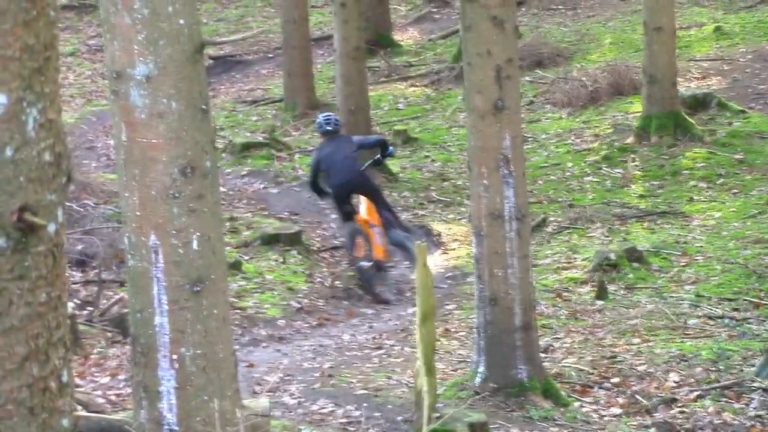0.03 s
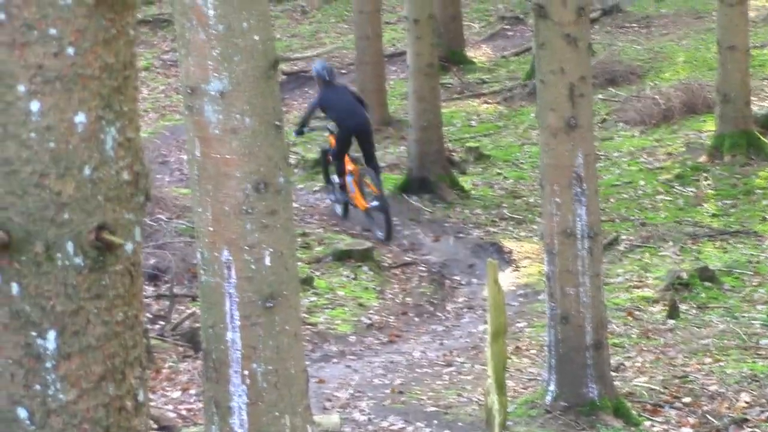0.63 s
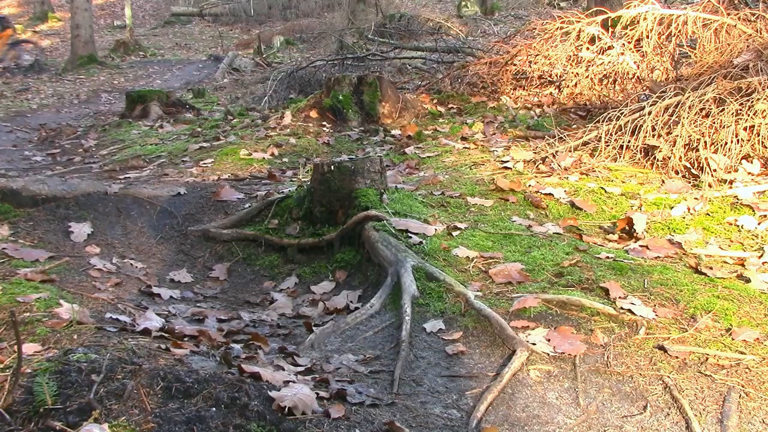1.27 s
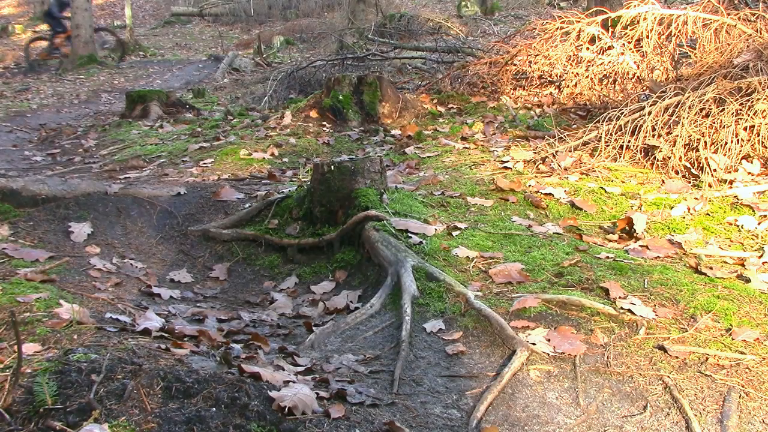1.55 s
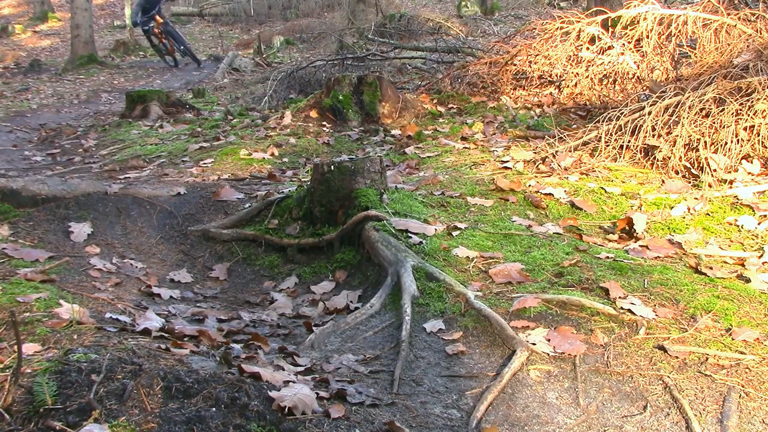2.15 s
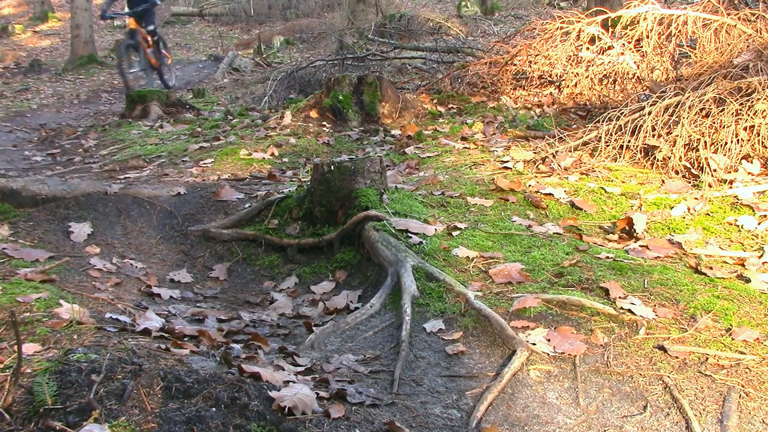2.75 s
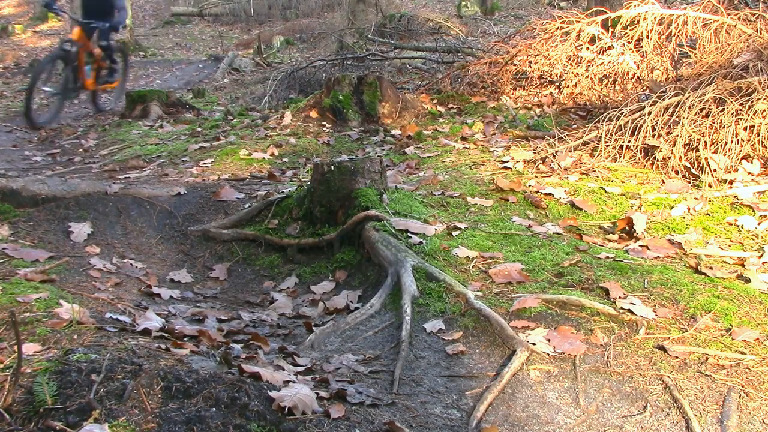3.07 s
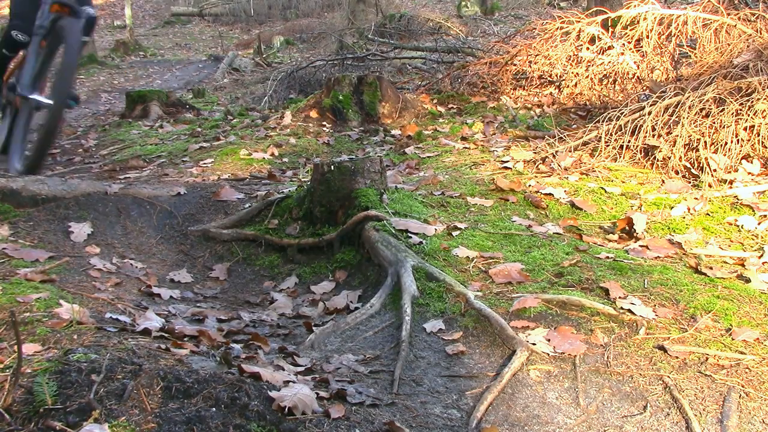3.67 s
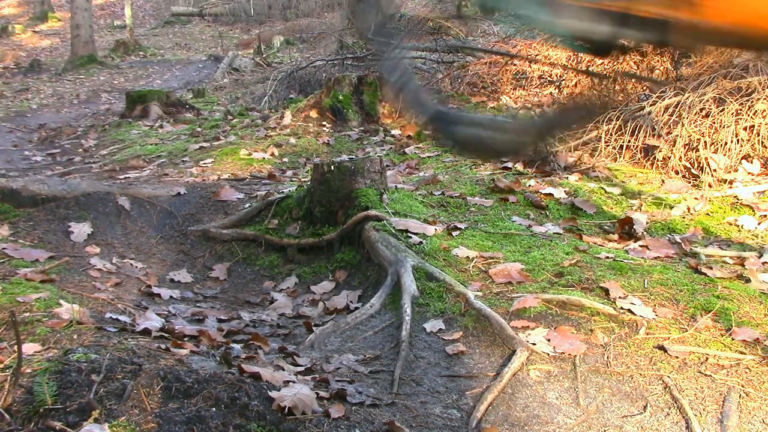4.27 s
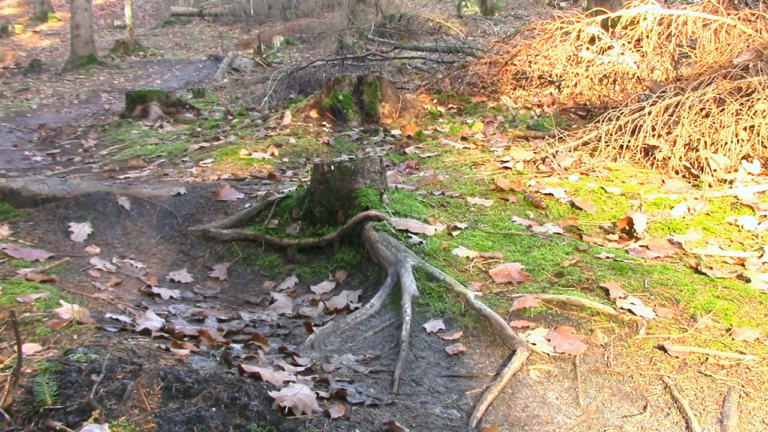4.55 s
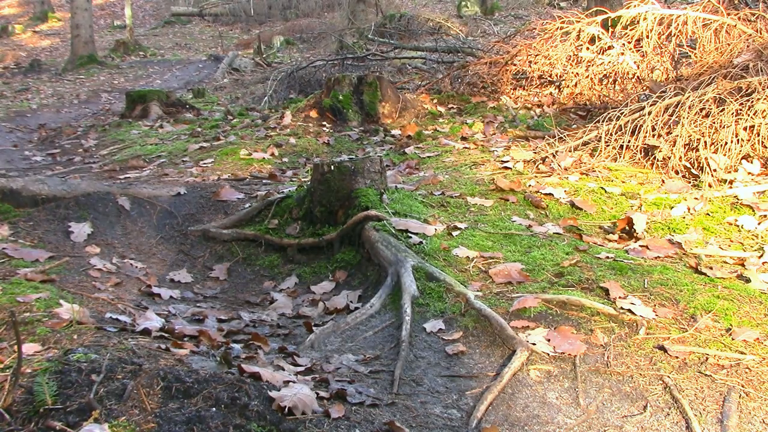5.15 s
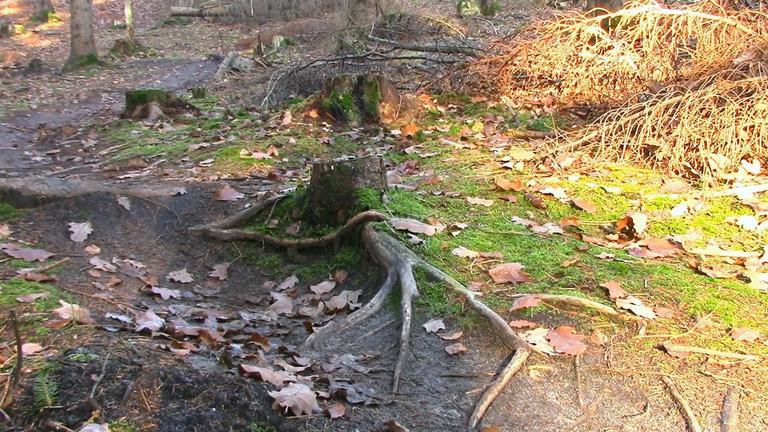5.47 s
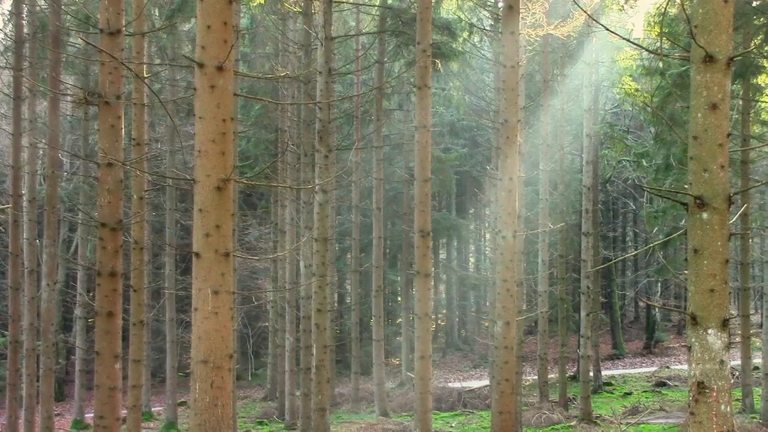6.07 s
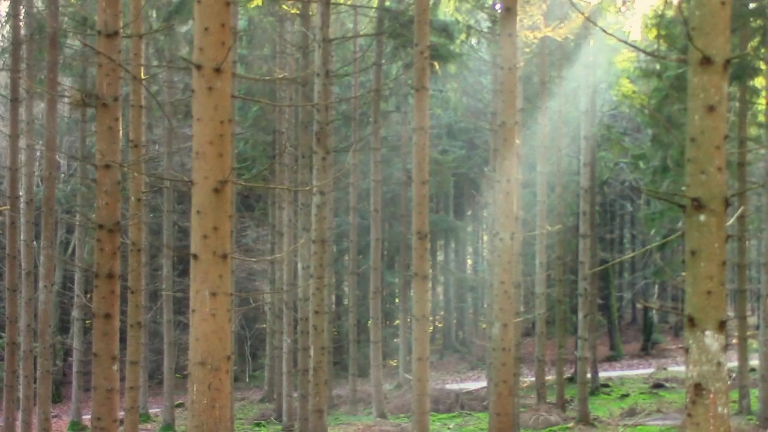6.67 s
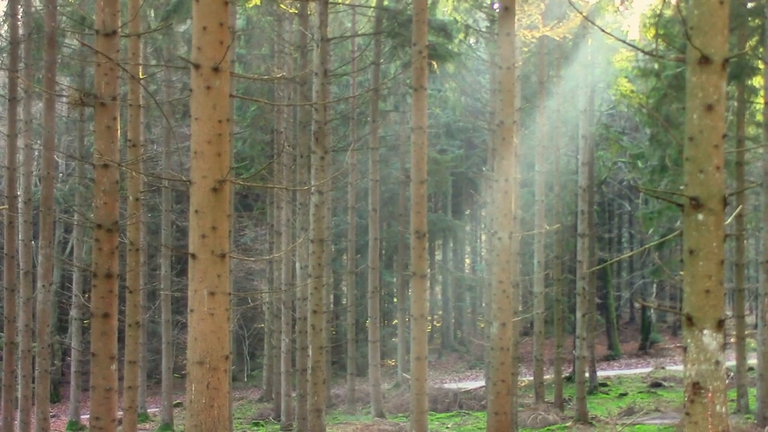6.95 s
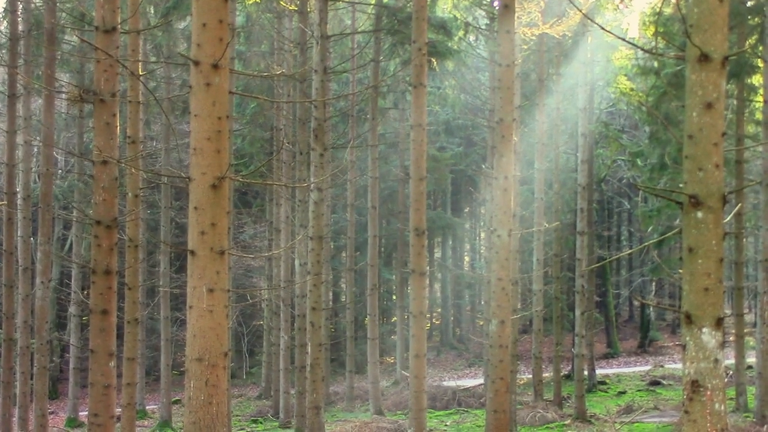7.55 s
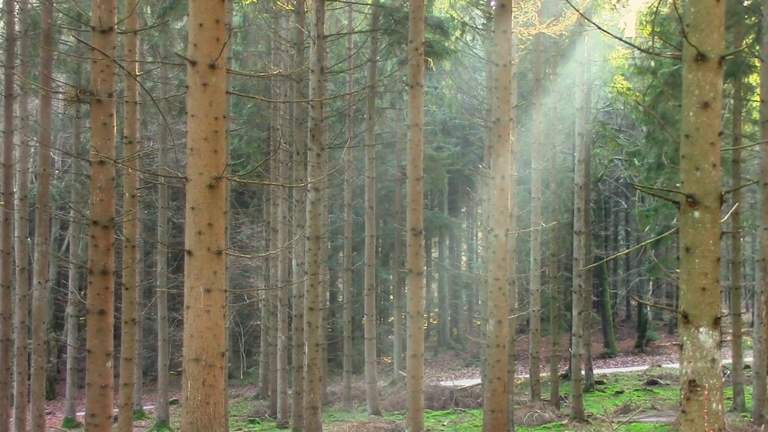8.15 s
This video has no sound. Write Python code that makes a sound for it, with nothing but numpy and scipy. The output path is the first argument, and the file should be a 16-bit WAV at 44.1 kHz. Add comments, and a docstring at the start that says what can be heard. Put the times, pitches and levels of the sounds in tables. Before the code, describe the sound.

A mountain bike rides a leafy forest trail, starting some way off with a tyre scuff, rumble and a few clacks, followed by faint freewheel ticking. A small bird gives two thin, high squeaks at about 1.7 seconds. The tyres rumble and crunch closer, and from 3.3 seconds sharp clacks and thumps over roots build up with rapid ticking. The bike takes off and passes right by the microphone at 4.3 seconds, then lands at about 4.5 with the loudest thump, a crack and sprays of grit. Weaker bounces follow as it rolls away, the knocks echoing lightly among the trees. At 5.8 seconds the background changes to a louder, steady forest hiss. The bike is now further off, with a burst of freewheel buzzing, a rattle at 6.5, a few clicks, then more ticking and a faint tyre hum around 8 seconds.

```python
"""A mountain bike coasts down a leafy forest trail, freehub pawls ticking: a corner and a jump far off,
then a close pass with take-off and hard landing. Tyres rumble, crush leaves and spray grit; roots
ring tyre and frame; chain, brake, stones and twigs clack. A small bird squeaks twice; trunks echo.
Then the scene changes to a hissier stretch of forest, where the bike rattles by further away."""
import sys
import numpy as np
from scipy import signal
from scipy.fft import rfft, irfft, next_fast_len
from scipy.io import wavfile

SR = 44100
rng = np.random.default_rng(int(sys.argv[2]) if len(sys.argv) > 2 else 0)


def to_wav(s):
    """Save 16-bit WAV."""
    ch = np.atleast_2d(s).T  # columns
    pcm = np.round(np.clip(ch, -1, 1) * 32767)  # PCM
    wavfile.write(sys.argv[1], SR, pcm.astype(np.int16))


N = 371322
T = np.arange(N) / SR
PASS_S, PASS_DISTANCE_M, SPEED_M_PER_S = 4.294, 1.31, 6.1
DISTANCE_M = np.hypot(PASS_DISTANCE_M, SPEED_M_PER_S * (T - PASS_S))
SCENE_CHANGE_S = 5.826
FAR = np.clip((T - SCENE_CHANGE_S) / 0.0019, 0, 1)  # 0 in the first scene, 1 in the second


def from_db(db):
    """Decibels to gain."""
    return 10 ** (np.asarray(db) / 20)


def rms_one(x):
    """Scale to rms 1."""
    return x / np.sqrt(np.mean(x ** 2) + 1e-20)


def cut(x, hz, kind="low", order=2):
    """Butterworth low- or high-pass."""
    return signal.sosfilt(signal.butter(order, hz, kind, fs=SR, output="sos"), x)


def drift(rate_hz):
    """Random curve through knots of spread 1."""
    knots = rng.standard_normal(4000)
    return np.interp(T * rate_hz, np.arange(len(knots)), knots)


def swell(at_s, half_s):
    """Bell curve of height 1."""
    return np.exp(-((T - at_s) / half_s) ** 2)


def ring(x, hz, t60_s):
    """One mode: a unit click starts a decaying sine."""
    r, w = from_db(-60 / (t60_s * SR)), 2 * np.pi * hz / SR
    return signal.lfilter([0, np.sin(w)], [1, -2 * r * np.cos(w), r * r], x + 1e-18)


def tails(x, decay_s):
    """Give each spike an exponential tail."""
    return signal.lfilter([1], [1, -np.exp(-1 / (decay_s * SR))], x + 1e-18)


def add(out, at_s, sound):
    """Mix a sound in."""
    i = int(at_s * SR)
    out[..., i:i + sound.shape[-1]] += sound[..., :N - i]


def coloured(spectrum, envelope, ripple_db=0):
    """Enveloped stereo noise through a unit-power filter; ripple adds narrow resonances."""
    size = next_fast_len(N + 4096, True)
    hz = np.arange(size // 2 + 1) * SR / size
    knot_hz, knot_db = np.transpose(spectrum)
    shape_db = np.interp(np.log(hz + 1e-3), np.log(knot_hz), knot_db)
    ripple = np.interp(hz, np.linspace(0, SR / 2, 300), rng.standard_normal(300))
    bass_loss = 1 + (.6 * knot_hz[0] / (hz + 1)) ** 4
    gain = rms_one(from_db(shape_db + ripple_db * ripple) / bass_loss + 1e-5)
    cepstrum = irfft(np.log(gain), size)
    response = np.exp(rfft(2 * cepstrum[:size // 2], size) - cepstrum[0])  # minimum phase: no pre-echo
    noise = rng.standard_normal((2, N)) * envelope
    mid, side = irfft(rfft(noise, size) * response, size)[:, :N]
    return mid + from_db(-17) * side * [[1], [-1]]


def grains(per_s, spread_db, bed):
    """Envelope of breaking leaves and grit: uneven spikes on an even bed, rms 1."""
    breaks = rng.random(N) < per_s / SR
    sizes = from_db(spread_db * np.minimum(rng.exponential(1, N), 4))
    return rms_one(bed + rms_one(tails(breaks * sizes, decay_s=0.0005)))


def contact(rattle_s, rattle):
    """Force of one blow, then a dying rattle of loose parts."""
    t = np.arange(SR // 3) / SR
    force = rattle * rng.standard_normal(len(t)) * np.exp(-t / rattle_s)
    force[0] += 1
    return force


def tyres():
    """Knobbly tyres rumble and crush leaves, louder when near and loaded; far off they also hum."""
    # tyre load in corner, dip, rise, take-off, air, landing, dip: t/s, gain/dB, half length/s
    loads = [(0.132, 12, 0.51), (1.775, 5.5, 0.21), (2.66, -2.5, .25), (3.82, 7.5, .08), (4.14, -10, .14),
             (4.53, 6.5, 0.18), (5.698, 3, 0.085)]
    # tyre noise spectra: f/Hz, density/dB
    rumble_spectrum = [(24, -51), (40, -23), (80, -11.5), (150, -2), (215, 0.5), (261, -0.5), (362, 0.5),
                       (452, -3), (548, -3), (1400, -19), (1820, -39), (3080, -120)]
    crunch_spectrum = [(600, -4), (1200, 1.5), (2400, 2), (3100, 3), (4000, -0.5), (5000, -6.5), (7000, -6),
                       (15500, -20.5)]
    hum_spectrum = [(250, -6.5), (490, 8), (700, -3), (1200, -32)]
    load_db = sum(db * swell(at_s, half_s) for at_s, db, half_s in loads)
    near_gain = (1 - FAR) * from_db(load_db) / DISTANCE_M
    rumble = coloured(rumble_spectrum, near_gain * from_db(-35.5 + 2.9 * drift(45)))
    receding = FAR * from_db(-49 - 5 * (T - SCENE_CHANGE_S))
    leaves = grains(per_s=450, spread_db=2.5, bed=1.48) * from_db(3.08 * drift(35))
    crunch = coloured(crunch_spectrum, (near_gain * from_db(-37) + receding) * leaves)
    firm_ground = swell(at_s=8.04, half_s=0.2)
    hum = coloured(hum_spectrum, FAR * from_db(-59 + 11 * firm_ground))
    return rumble + crunch + hum


def forest_air():
    """Steady background noise, louder in the second scene."""
    # air spectra of the two scenes: f/Hz, density/dB
    first_spectrum = [(24, -50), (40, -10), (106, -3), (296, -4.5), (1170, -10), (1470, -11.5), (2030, -17),
                      (5530, -19), (12300, -25.5), (15800, -46)]
    second_spectrum = [(24, -56), (40, -19), (133, -10), (214, -0.5), (344, -8), (659, -3), (983, -7),
                       (1090, -2.5), (1360, -13), (3110, -14), (4880, -28.5), (8450, -25), (10900, -35.5),
                       (15800, -60)]
    first = coloured(first_spectrum, (1 - FAR) * from_db(-61.5))
    return first + coloured(second_spectrum, FAR * from_db(-50.5))


def clacks():
    """Small hard impacts: a crack, a main mode and a weaker one above it."""
    # chain, brake, stones, twigs: t/s, peak/dB, f/Hz, t60/s, rattle decay/s
    impacts = [(0.071, -25.5, 1900, 0.0064, 0.0028), (0.175, -25.5, 1527, 0.038, 0.013),
               (1.169, -39.5, 1320, 0.0015, .012), (2.061, -32.5, 2350, .008, .0024),
               (2.387, -43, 1760, 0.0098, 0.17), (3.128, -29, 1410, 0.0025, 0.0014),
               (3.2819, -16.5, 2270, 0.0086, 0.006), (3.2853, -5.5, 1725, 0.019, 0.000044),
               (3.865, -22.5, 1690, 0.0097, 0.017), (4.329, -12, 3370, 0.0054, 0.0078),
               (4.452, 1, 670, 0.0096, .00008), (4.619, -19.5, 2610, .004, 0.021),
               (6.52, -29, 657, 0.053, 0.038), (7.137, -20, 2000, 0.0045, 0.0029),
               (7.6009, -13, 2410, 0.0025, 0.00014)]
    out = np.zeros(N)
    for at_s, db, hz, t60_s, rattle_s in impacts:
        force = contact(rattle_s, rattle=0.3)
        crack = cut(cut(force, 470, "high"), 6300)
        ringing = ring(force, hz, t60_s) + .5 * ring(force, hz * 1.296, t60_s * 0.56)
        clack = cut(ringing, hz * 0.25, "high") + 0.57 * crack
        add(out, at_s, from_db(db) * clack / np.abs(clack).max())
    return out


def bounces(count, start_s=4.551, gap_s=.16, stretch=1.048):
    """Blows of the bike settling after landing, ever weaker and further apart."""
    times_s = start_s + np.r_[0, np.cumsum(gap_s * stretch ** np.arange(count - 1))]
    first_db, loss_db, hard_hz, low_hz, rattle_s = -20, 3.5, 1010, 127, 0.03
    return [(at_s, first_db - loss_db * k, hard_hz, low_hz, rattle_s) for k, at_s in enumerate(times_s)]


def thumps():
    """Blows ring tyre and frame; soft ones favour the low modes, glancing ones lack bass."""
    # blows on roots and ground: t/s, peak/dB, hardness low-pass/Hz, high-pass/Hz, rattle decay/s
    blows = [(0.177, -23.5, 2500, 130, 0.0096), (.664, -37.5, 500, 95, 0.013),
             (1.978, -38, 500, 149.4, .02), (2.153, -37, 600, 220, 0.0053), (2.436, -37, 502.4, 200, 0.012),
             (3.258, -27, 1200, 150, 0.017), (3.282, -22, 900, 146, 0.034),
             (3.564, -27.5, 1500, 247, 0.0041), (3.717, -26, 1400, 189, 0.03),
             (3.794, -15, 500, 220, 0.019), (3.851, -20.5, 500, 237, 0.0053),
             (3.985, -26.5, 700, 243, 0.006), (4.2923, -13.5, 1300, 100, 0.025),
             (4.4543, -5, 510, 99, 0.0036), (4.476, -11, 1190, 100, 0.017), (4.62, -13.5, 1465, 130, 0.017),
             (6.527, -39.5, 400, 130, 0.018), (7.376, -38, 59, 149, .01)]
    # tyre, rim and frame modes: f/Hz, level/dB, t60/s
    modes = [(84, -66, .07), (128, -27, 0.035), (171.4, -11.5, 0.14), (229, -2, 0.026), (290, -14, 0.055),
             (326, -0.5, 0.022), (493, 8, 0.014), (646, -3, 0.026), (769, 4, 0.013), (1040, 12, 0.0038),
             (1700, 5.5, 0.011)]
    out = np.zeros(N)
    for at_s, db, hard_hz, low_hz, rattle_s in blows + bounces(count=5):
        force = cut(contact(rattle_s, rattle=.13), hard_hz, order=1)
        body = sum(from_db(mode_db) * ring(force, hz, t60_s) for hz, mode_db, t60_s in modes)
        body = cut(body, low_hz, "high", order=4)
        add(out, at_s, from_db(db) * body / np.abs(body).max())
    return out


def scuffs():
    """A sliding tyre throws short sprays of grit."""
    # slides on dirt and leaves: t/s, level/dB, decay/s, low-pass/Hz
    slides = [(0.177, -38, 0.018, 2500), (.248, -39.5, 0.049, 6100), (2.809, -50, 0.045, 7000),
              (3.331, -37, 0.036, 12300), (3.796, -49, .11, 3500), (4.313, -23, 0.013, 5000),
              (4.3282, -20, 0.02, 4000), (4.376, -34, 0.067, 6000), (4.4503, -22.5, 0.023, 5970),
              (4.71, -46.5, 0.49, 5970), (6.517, -32.5, 0.015, 2800), (6.786, -49, 0.15, 4500),
              (7.309, -48.5, .029, 5000)]
    # grit spectrum: f/Hz, density/dB
    grit_spectrum = [(500, -4.5), (1400, -4.5), (3100, 1), (4200, -2), (5200, -7), (10000, -5),
                     (15500, -25)]
    out, t = np.zeros((2, N)), np.arange(SR) / SR
    grit = coloured(grit_spectrum, grains(per_s=1500, spread_db=3.0, bed=1.2))
    for at_s, db, decay_s, bright_hz in slides:
        i = int(at_s * SR)
        spray = rms_one(cut(grit[:, i:i + len(t)], bright_hz, order=1))
        envelope = np.exp(-(t / decay_s) ** 1.7) * (1 - np.exp(-t / 0.00037))
        add(out, at_s, from_db(db) * spray * envelope)
    return out


def ratchet(rate_hz, start_s, end_s):
    """One snap per tooth passed, at a power independent of the rate."""
    rate_hz = np.maximum(rate_hz, 1)
    teeth = np.cumsum(rate_hz * (T >= start_s) * (T < end_s)) / SR
    return np.diff(np.ceil(teeth), prepend=0) / np.sqrt(rate_hz)


def freehub():
    """Pawls snap over the ratchet at wheel speed; each snap shimmers briefly in hub and spokes."""
    # pawl snaps through the close jump: t/s, rate/Hz
    jump = [(3.404, 82), (3.6, 59), (3.85, 63), (4.11, 40.5), (4.2, 58), (4.38, 38), (4.65, 68), (4.92, 47),
            (5.27, 72), (5.544, 45)]
    # distant coasts, fastest and loudest at a crest:
    # start/s, crest/s, end/s, crest rate/Hz, rate slope/(Hz/s), crest level/dB, level slope/(dB/s)
    coasts = [(.355, .38, 0.9, 65, 17, -31.5, 36), (1.351, 1.6, 2.4, 41.4, 7.6, -31, 9),
              (5.847, 6.08, 6.445, 90, 125, -16.5, 20), (7.501, 7.707, 7.97, 93, 39, -23.5, 30),
              (7.978, 8.167, 8.6, 84, 15.4, -28.5, 18)]
    # spectra of the hub and the pawls' upper ring: f/Hz, density/dB
    hub_spectrum = [(1180, -37), (2000, -32), (2220, -22), (2680, 5.5), (3080, 3.5), (3360, -24),
                    (3830, -14), (5130, -14), (7770, -6.5), (8550, -10), (10900, -5.5), (13300, -9),
                    (15800, -14.5)]
    pawl_spectrum = [(2900, -51), (3350, -4), (3700, 4), (4250, -3), (5200, -51)]
    jump_s, jump_hz = np.transpose(jump)
    snaps = ratchet(np.interp(T, jump_s, jump_hz), jump_s[0], jump_s[-1])
    snaps *= from_db(-8) / DISTANCE_M ** 1.6
    for start_s, crest_s, end_s, crest_hz, hz_per_s, db, db_per_s in coasts:
        off_s = np.abs(T - crest_s)
        snaps += ratchet(crest_hz - hz_per_s * off_s, start_s, end_s) * from_db(db - db_per_s * off_s)
    shimmer = tails(snaps * from_db(1.36 * drift(60)), decay_s=0.0042)
    shimmer = cut(shimmer, 390, order=1)
    hub = coloured(hub_spectrum, shimmer, ripple_db=4.0)
    return hub + coloured(pawl_spectrum, shimmer * from_db(-12 + 3.5 * drift(50)))


def bird(drop_hz=398, settle_s=.004):
    """Thin wavering whistles with a faint octave; each drops onto its pitch."""
    # notes: t/s, length/s, level/dB, f/Hz
    notes = [(1.614, 0.028, -37, 7740), (1.643, 0.031, -36, 7700), (1.667, 0.035, -37.5, 7960),
             (1.754, 0.029, -32, 7780), (1.782, 0.015, -26.5, 7820), (1.796, 0.019, -35.5, 7620)]
    out = np.zeros(N)
    for at_s, length_s, db, hz in notes:
        t = np.arange(int(length_s * SR)) / SR
        pitch_hz = hz + drop_hz * np.exp(-t / settle_s) + 70 * drift(500)[:len(t)]
        phase = 2 * np.pi * np.cumsum(pitch_hz) / SR
        envelope = np.sqrt(np.sin(np.pi * t / length_s)) * from_db(db + 3.7 * drift(356)[:len(t)])
        add(out, at_s, envelope * (np.sin(phase) + from_db(-14) * np.sin(2 * phase)))
    return out


def trunks(x, t60_s, dull_hz):
    """Many faint echoes scattered back by the trees."""
    t = np.arange(SR) / SR
    taps = rng.standard_normal((2, SR)) * (rng.random((2, SR)) < .05)
    mid, side = taps * from_db(-60 * t / t60_s) * (t > .008)
    response = np.array([mid + 0.092 * side, mid - 0.067 * side]) / np.linalg.norm(mid)
    return signal.fftconvolve(cut(x, dull_hz)[None], response, axes=1)[:, :N]


def close_pass(x):
    """Past the microphone the treble widens and one band fades; in the far scene the treble narrows."""
    near = T < SCENE_CHANGE_S
    passed = np.clip(1 + (T - PASS_S) / 0.042, 0, 1)
    width_db = np.where(near, 13 * passed, -14.5)
    side = (x[0] - x[1]) / 2
    side_treble = np.where(near, cut(side, 9700, "high", order=1), cut(side, 2100, "high", order=1))
    x = x + (from_db(width_db) - 1) * side_treble * [[1], [-1]]
    away = np.clip((T - 4.42) / 0.12, 0, 1) * near
    band = signal.sosfilt(signal.butter(1, (8200, 12100), "band", fs=SR, output="sos"), x)
    return x - 0.65 * away * band


def scene():
    """Bike, bird and forest in stereo."""
    knocks, squeaks, sprays = thumps() + clacks(), bird(), scuffs()
    echoes = from_db(-16) * trunks(knocks + sprays.mean(axis=0), t60_s=0.98, dull_hz=4550)
    echoes += from_db(-14.5) * trunks(squeaks, t60_s=0.56, dull_hz=11000)
    trail = close_pass(sprays + freehub() + tyres() + forest_air())
    return trail + echoes + knocks * from_db([[.4], [-.4]]) + squeaks * from_db([[1.3], [-1.3]])


def record(dry, ceiling=.85, cutoff_hz=15900):
    """Soft overload on the hardest peaks, then a steep low-pass."""
    rounded = dry / (1 + (dry / ceiling) ** 8) ** (1 / 8)
    return signal.sosfilt(signal.ellip(10, .1, 80, cutoff_hz, fs=SR, output="sos"), rounded)


dry = scene()
out = record(dry)
to_wav(out)
```